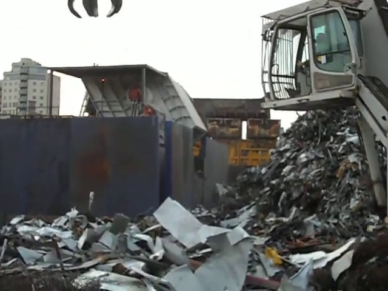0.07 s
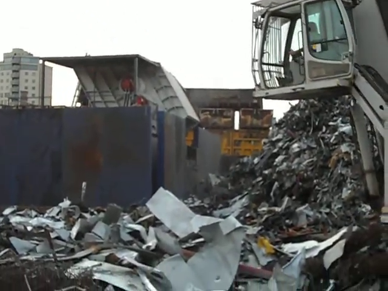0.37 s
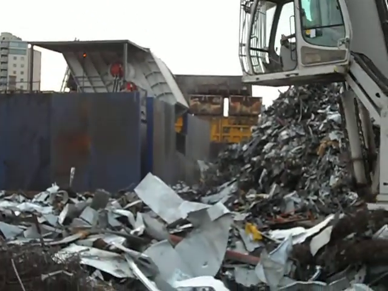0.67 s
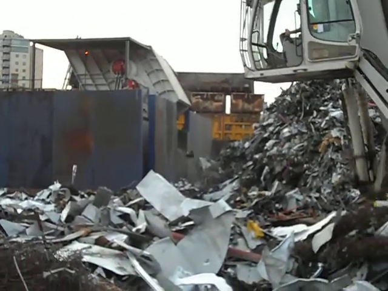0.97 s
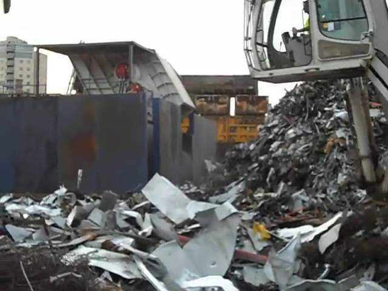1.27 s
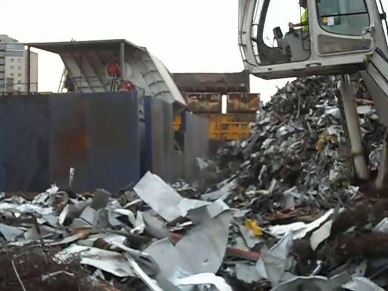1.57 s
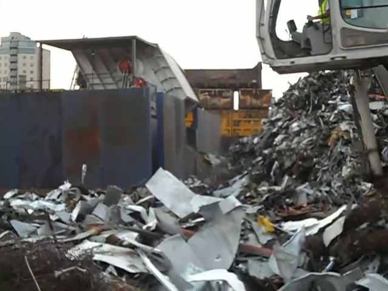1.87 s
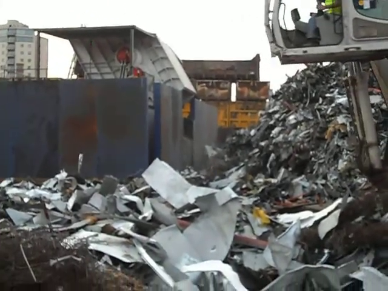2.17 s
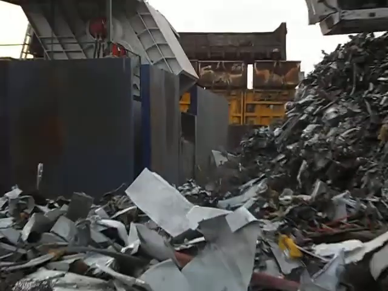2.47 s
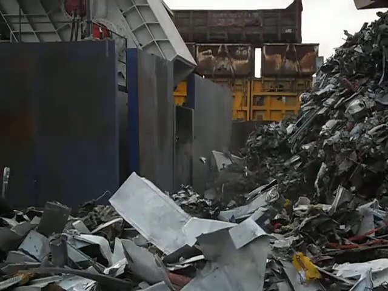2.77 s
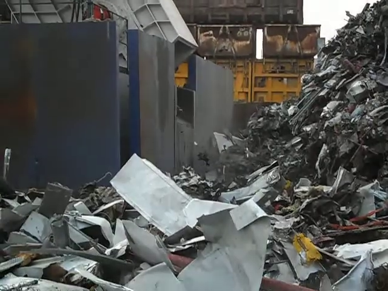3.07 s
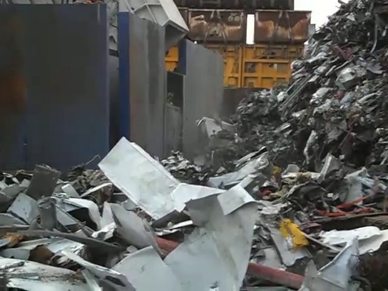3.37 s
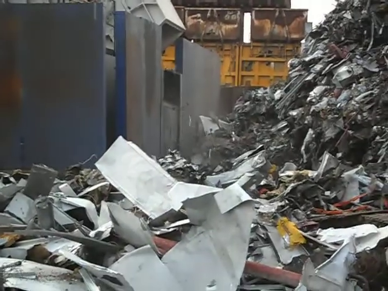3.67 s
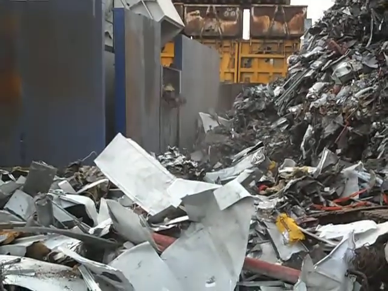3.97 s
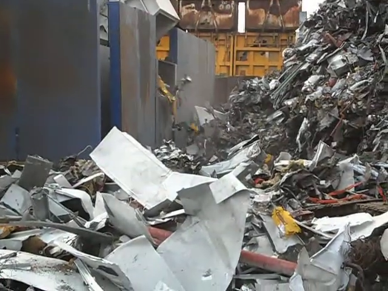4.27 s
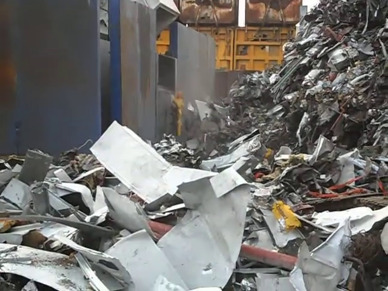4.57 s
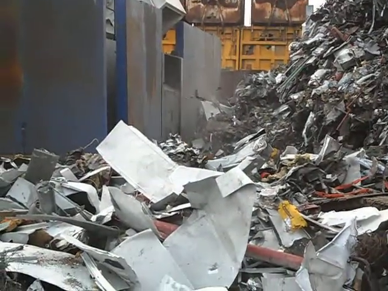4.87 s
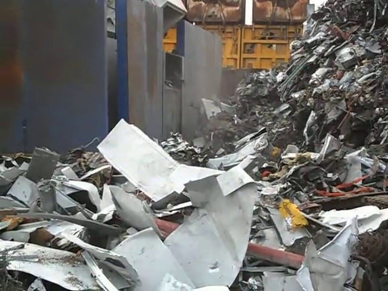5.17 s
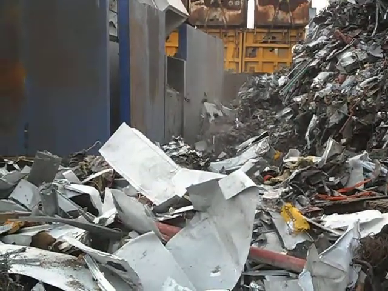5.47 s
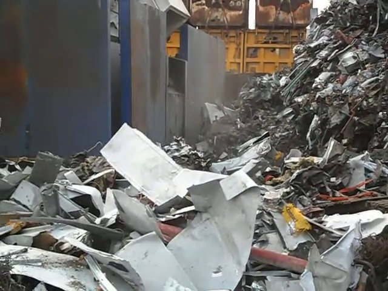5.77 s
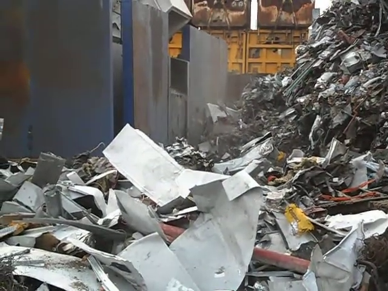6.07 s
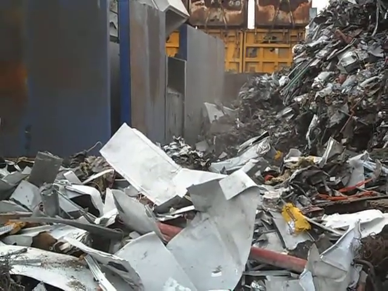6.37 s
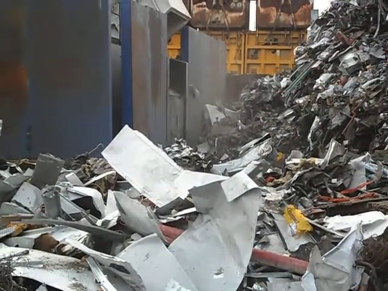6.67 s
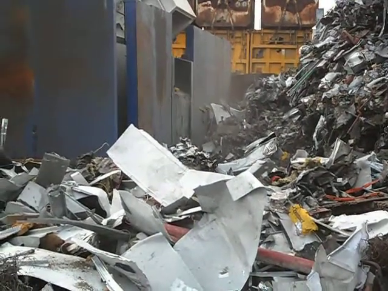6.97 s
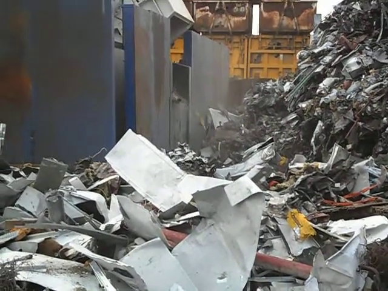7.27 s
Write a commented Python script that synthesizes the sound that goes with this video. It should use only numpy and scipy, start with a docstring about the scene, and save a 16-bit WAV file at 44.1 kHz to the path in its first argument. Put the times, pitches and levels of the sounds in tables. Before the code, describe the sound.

An industrial shredder tears up scrap metal outdoors, heard from a distance with short echoes. A dense, crunching roar of clanks sits over a swelling low hum, with a faint hydraulic hiss early on. Everything drops to silence for half a second, then returns with clusters of hard bangs, a brief high squeal of dragged sheet metal and showers of tinkling fragments.

```python
"""Scrap metal shredder in a yard

Some way off, a rotor hums while hammers batter scrap inside a booming steel housing.
Torn pieces clatter down a chute; big ones bang, ring and scrape.
A crane's hydraulics hiss at first. The sound cuts out for half a second and resumes."""
import sys
import numpy as np
from scipy import signal
from scipy.fft import rfft, irfft, next_fast_len
from scipy.io import wavfile
from scipy.ndimage import uniform_filter1d

SR = 44100
rng = np.random.default_rng(int(sys.argv[2]) if len(sys.argv) > 2 else 0)


def output_pcm(signal):
    """Save a mono or channel-first signal as 16-bit PCM at the path in sys.argv[1].

    Samples are clipped to [-1, 1] before scaling.
    """
    pcm = np.clip(np.atleast_2d(signal).T, -1, 1) * 32767
    wavfile.write(sys.argv[1], SR, np.round(pcm).astype(np.int16))


N = 327222


def amp(db):
    """Turn decibels into a gain to multiply by."""
    return 10 ** (np.asarray(db) / 20)


def unit(x):
    """Scale a signal to an average (RMS) size of 1."""
    return x / np.sqrt(np.mean(x ** 2) + 1e-20)


def level(rows):
    """Join (time_s, level_db) points into a gain for every sample."""
    time_s, level_db = np.transpose(rows)
    return amp(np.interp(np.arange(N) / SR, time_s, level_db))


def add(mix, start_s, sound):
    """Mix a sound in at the given time."""
    part = mix[max(round(start_s * SR), 0):][:len(sound)]
    part += sound[:len(part)]


def colour(x, tone, size=8192):
    """Shape lows and highs with a filter that never sounds early, so hits stay sharp."""
    hz, db = np.transpose(tone)
    f = abs(np.fft.fftfreq(size, 1 / SR))
    log_gain = np.log(amp(np.interp(np.log(f + 1), np.log(hz), db)))
    taps = np.fft.ifft(np.exp(np.conj(signal.hilbert(log_gain)))).real
    return signal.oaconvolve(x, taps[:size // 2])[:len(x)]


def drift(rate_hz, count):
    """A smooth random wobble that changes about rate_hz times a second."""
    size = next_fast_len(count)
    f = np.fft.rfftfreq(size, 1 / SR)
    slow_spectrum = rfft(rng.standard_normal(size)) * np.exp(-(f / rate_hz) ** 2)
    return unit(irfft(slow_spectrum, size))[:count]


def resonance(x, pitch_hz, width_hz):
    """Keep a narrow band of sound around a pitch, which may move."""
    turn = np.exp(2j * np.pi * np.cumsum(pitch_hz * np.ones(len(x))) / SR)
    decay = np.exp(-np.pi * width_hz / SR)
    return unit((turn * signal.lfilter([1], [1, -2 * decay, decay * decay], x / turn)).real)


def burst(t, length_s, rise_s, fall_s):
    """A gain that rises at t = 0, holds, then dies away."""
    return (1 - np.exp(-np.maximum(t, 0) / rise_s)) * np.exp(-np.maximum(t - length_s, 0) / fall_s)


def knocks(per_s, spread_db, count):
    """Random pushes and pulls: many small, a few large."""
    chance, size, side = rng.random((3, count))
    size = np.minimum(-np.log(1 - size), 4)
    return (chance < per_s / SR) * amp(spread_db * size) * np.sign(side - .5)


def piece(spacing_hz, fade_s, size=4096):
    """A crumpled piece rings at random pitches about spacing_hz apart, losing 60 dB in fade_s."""
    chance, phase = rng.random((2, size // 2 + 1))
    tones = (chance < SR / size / spacing_hz) * np.exp(2j * np.pi * phase)
    return unit(irfft(tones) * np.exp(-np.log(1000) * np.arange(size) / SR / fade_s))


def fragments(per_s, spread_db, fade_s, spacing_hz, count=400, size=4096):
    """A stream of pieces: each tumbles by, is knocked a few times and is gone."""
    out = np.zeros(N + size)
    for k in range(count):
        hits = knocks(per_s * N / (count * size), spread_db, size)
        start_s = (k + rng.random()) / count * len(out) / SR
        add(out, start_s, signal.fftconvolve(hits, piece(spacing_hz, fade_s)))
    return unit(out[size:])


def yard(x, echo_db, fade_s):
    """Add scattered echoes from steel walls and scrap heaps."""
    t = np.arange(SR // 2) / SR
    echoes = rng.standard_normal(len(t)) * (rng.random(len(t)) < .1) * (t > .006)
    echoes *= np.exp(-np.log(1000) * t / fade_s)
    return x + amp(echo_db) * signal.oaconvolve(x, echoes / np.linalg.norm(echoes))[:len(x)]


# How hard the shredder works before and after the silence: time_s, relative_load_db
WORK_BEFORE = [(0, -21.5), (0.27, -18.5), (0.52, -21), (0.72, -19), (1.12, -19.5), (1.37, -24.5),
               (1.47, -20.5), (1.66, -20.0), (1.77, -21.5), (1.9, -18.5), (2.17, -20.0)]
WORK_AFTER = [(2.74, -18.5), (2.95, -20.5), (3.06, -23.0), (3.2, -19.5), (3.58, -17.5), (3.679, -23),
              (4.2, -18.0), (4.5, -19.5), (4.76, -18.0), (4.87, -22.5), (5.0, -18.5), (5.33, -18),
              (5.42, -24), (5.7, -23.5), (5.88, -18.5), (6.12, -20), (6.3, -23.0), (6.65, -20),
              (6.92, -18.5), (7.05, -20), (7.4, -19)]

def load_gain(db, follow):
    """Harder work is louder: the gain grows by `follow` dB for each dB of load."""
    return amp(db) * unit(level(np.vstack([WORK_BEFORE, WORK_AFTER]))) ** follow


# Moments when the hum swells: peak_s, level_db
HUM_PEAKS = [(.56, -17.5), (1.0, -25), (1.57, -18.5), (2.87, -32.5), (4.16, -19), (4.38, -20.5),
             (7.19, -18.5)]
# Strength of the frame's deep rumble: time_s, relative_level_db
RUMBLE_LEVELS = [(0, -26), (1.4, -30), (2.2, -26.5), (3.2, -31), (3.45, -26.5), (3.75, -32.5),
                 (4.25, -24.5), (4.85, -29), (5.45, -34.5), (5.85, -28.5), (7.4, -27.5)]
# Tone of that rumble: pitch_hz, relative_level_db
RUMBLE_TONE = [(15, -20.5), (26, -4.5), (33, 2), (47, -5), (62, -1.5), (100, -5), (140, -3.5), (260, -55)]

def rotor(turn_hz=20.5, throb_db=-32, hum_hz=150.9, wander=.01, swell_s=0.11):
    """The rotor throbs once a turn and hums, louder under load; the frame shakes with it."""
    t = np.arange(N) / SR
    clock = np.cumsum(1 + wander * drift(8.6, N)) / SR  # the speed is slightly uneven
    throb = amp(throb_db) * np.sin(2 * np.pi * turn_hz * clock)
    swells = sum(amp(db) * np.exp(-((t - peak_s) / swell_s) ** 2) for peak_s, db in HUM_PEAKS)
    hum = np.hypot(load_gain(db=-29, follow=0.67), swells) * np.sin(2 * np.pi * hum_hz * clock)
    rumble = amp(2) * level(RUMBLE_LEVELS) * unit(colour(rng.standard_normal(N), RUMBLE_TONE))
    return throb + hum + rumble


# Low notes of the steel housing: pitch_hz, width_hz, relative_level_db
HOUSING_NOTES = [(155, 19, -5), (178.4, 17.5, -2.5), (209.8, 27, -4.5)]
# Heavy lumps thumping round inside: start_s, length_s, relative_level_db
LUMPS = [(.06, 0.26, -21), (0.877, .11, -17.5), (1.631, 0.069, -15.5), (2.057, 0.057, -15.5),
         (2.16, 0.046, -15), (2.7, .05, -18.5), (4.25, 0.13, -18), (6.65, 0.046, -18.5),
         (6.89, .045, -15.5)]
# Tone of the hammer blows: pitch_hz, relative_level_db
BLOW_TONE = [(70, -34), (125, -11.5), (160, -5), (180, 1), (215, -2.5), (255, -7.5), (330, -10),
             (480, -20.5), (1000, -53.5)]

def housing():
    """Hammer blows make the heavy steel box boom, most of all when a lump goes round."""
    t = np.arange(N) / SR
    blows = unit(knocks(per_s=420, spread_db=3, count=N)) + amp(-1.5) * rng.standard_normal(N)
    boom = unit(sum(amp(db) * resonance(rng.standard_normal(N), pitch_hz, width_hz)
                    for pitch_hz, width_hz, db in HOUSING_NOTES))
    thumps = sum(amp(db) * burst(t - start_s, length_s, rise_s=.008, fall_s=0.014)
                 for start_s, length_s, db in LUMPS)
    force = np.hypot(load_gain(db=-23, follow=0.62), thumps)  # hypot adds their powers
    return force * (amp(-2) * unit(colour(blows, BLOW_TONE)) + amp(-4.5) * boom)


# Tone of scrap being torn: pitch_hz, relative_level_db
CRUNCH_TONE = [(120, -18.5), (260, -4), (350, -3), (450, 0.5), (600, -2.5), (800, -3), (1020, -4),
               (1350, -9.5), (1700, -11), (2100, -19), (3000, -27.5), (6000, -53.5)]

def crunch():
    """Scrap is torn and tumbled inside: a crowd of short clanks over a roar."""
    clanks = fragments(per_s=750, spread_db=3, fade_s=0.034, spacing_hz=50.24)
    roar = amp(0.5) * rng.standard_normal(N)
    echoing = yard(clanks + roar, echo_db=-15.5, fade_s=0.29)
    return load_gain(db=-19.5, follow=1) * unit(colour(echoing, CRUNCH_TONE))


# Sudden showers from the chute: start_s, length_s, shreds_db, chips_db
CHUTE_SHOWERS = [(0, 0.36, -33, -45.5), (0.65, .04, -34, -44), (1.48, 0.12, -37.5, -45),
                 (1.81, 0.078, -36, -46), (3.29, .22, -29.5, -38), (4.047, 0.16, -38, -44),
                 (4.45, 0.19, -38, -45.5), (4.85, 0.33, -39, -45), (5.468, 0.47, -38.5, -49),
                 (6.554, 0.034, -30.5, -41), (6.8, 0.52, -39, -53)]
# Tones of the shreds and of the finer chips: pitch_hz, relative_level_db
SHRED_TONE = [(900, -6), (1900, -5), (2500, -0.5), (3200, -3), (3700, -4), (4600, -2.5), (5400, -7),
              (6200, -15), (8000, -26.5), (11000, -53.5)]
CHIP_TONE = [(3500, -21.5), (5500, 0.5), (6700, -0.5), (8000, -2), (9700, -6), (11000, -7.5)]

def shreds():
    """Shreds and fine chips clatter down the chute, in showers and in a stream that follows the load."""
    t = np.arange(N) / SR
    tinkle = fragments(per_s=760, spread_db=6, fade_s=0.04, spacing_hz=305)
    tinkle += amp(5.5) * rng.standard_normal(N)
    chips = fragments(per_s=560, spread_db=4, fade_s=0.047, spacing_hz=406)
    chips += amp(0.5) * rng.standard_normal(N)
    shred_flow = load_gain(db=-33.5, follow=0.84)
    chip_flow = load_gain(db=-45.5, follow=0.84)
    for start_s, length_s, shreds_db, chips_db in CHUTE_SHOWERS:
        shower = burst(t - start_s, length_s, rise_s=0.0059, fall_s=.035)
        shred_flow = np.hypot(shred_flow, amp(shreds_db) * shower)
        chip_flow = np.hypot(chip_flow, amp(chips_db) * shower)
    clatter = unit(colour(yard(tinkle, echo_db=-23, fade_s=.12), SHRED_TONE))
    return shred_flow * clatter + chip_flow * unit(colour(chips, CHIP_TONE))


# Hiss of the crane's hydraulics: time_s, level_db
HISS_LEVELS = [(0, -35), (.4, -37.5), (1.1, -39.5), (1.5, -37), (1.9, -35.5), (2.2, -37), (2.7, -63)]

def hydraulics(centre_hz=2950, split=0.071, waver=0.032, width_hz=260):
    """Oil sings through the crane's valves in two thin, wavering bands of hiss."""
    hiss = np.zeros(N)
    for side in (-1, 1):
        flow = rng.standard_normal(N)
        pitch_hz = centre_hz * (1 + side * split + waver * drift(12, N))
        hiss += resonance(flow, pitch_hz, width_hz)
    return level(HISS_LEVELS) * unit(hiss)


# Big pieces hit by the hammers: start_s, relative_level_db, extra_treble_db, cutoff_hz
BIG_HITS = [(0.213, -19, -9, 2000), (0.757, -14.5, 3.5, 4600), (.885, -22.5, 12, 3440),
            (1.113, -13.5, -5, 1510), (1.412, -20, -2, 3610), (2.712, -19, -2, 2500),
            (2.734, -15.5, -1, 5000), (2.833, -19.5, 2, 5000), (2.923, -13, -3, 5540),
            (3.362, -19.5, 7, 6000), (3.477, -18, 0.5, 5330), (3.526, -15, 1, 5060), (3.586, -15, -4, 5350),
            (4.161, -19.5, 8, 1490), (4.609, -14.5, -4, 5000), (4.717, -13, -1, 5300),
            (4.988, -13, -2.5, 5700), (5.125, -18, 8.5, 5300), (5.178, -17.5, 9.5, 5440),
            (5.309, -10, -2, 2450), (5.884, -18.5, 1, 2840), (6.118, -9.5, -16, 2400),
            (6.636, -22, 0, 2000), (6.869, -13.5, -19, 2520), (7.335, -15, -5, 1400)]
# Tone of a struck steel plate: pitch_hz, relative_level_db
PLATE_TONE = [(60, -33), (170, -5), (450, 1), (1000, 2), (1400, -2), (1800, -2), (2300, -8), (3200, -8.5),
              (4700, -14), (6200, -14), (10000, -15.5)]

def bangs(thud_s=0.16, crack_s=.04, rise_s=0.0019, treble_life=0.44, split_hz=1500):
    """A big piece cracks, rings and rattles against the walls; its treble dies first."""
    t, out = np.arange(SR // 3) / SR, np.zeros(N)
    fade = -np.log(1000) * t
    attack = 1 - np.exp(-t / rise_s)
    for start_s, db, treble_db, cutoff_hz in BIG_HITS:
        rattle = unit(knocks(per_s=810, spread_db=0.5, count=len(t))) + rng.standard_normal(len(t))
        clank = piece(spacing_hz=134.6, fade_s=1, size=len(t))
        struck = colour(amp(-3) * rattle + amp(-1) * clank, PLATE_TONE)
        body = unit(signal.sosfilt(signal.butter(7, cutoff_hz, fs=SR, output="sos"), struck))
        lows = signal.lfilter(*signal.butter(2, split_hz, fs=SR), body)
        highs = signal.lfilter(*signal.butter(2, split_hz, "high", fs=SR), body)
        thud = lows * np.exp(fade / thud_s)
        clash = amp(treble_db) * highs * np.exp(fade / (thud_s * treble_life))
        crack = amp(-20) * unit(struck) * np.exp(fade / crack_s)
        add(out, start_s, amp(db) * attack * (crack + thud - clash))
    return amp(-3.5) * yard(out, echo_db=-4, fade_s=0.17)


# Sheets that ring or squeal as they are dragged through: start_s, length_s, pitch_hz, wobble_hz, level_db
DRAGGED_SHEETS = [(0.218, 0.055, 431, 18, -18), (.758, 0.043, 1600, 220, -22), (1.11, 0.23, 461, 10.2, -21),
                  (2.92, 0.026, 990, 98, -17.5), (3.146, 0.15, 3960, 130, -38.5),
                  (3.18, 0.18, 3730, 110, -35), (3.239, 0.18, 3610, 130, -33),
                  (5.169, 0.019, 4500, 130, -29.5), (5.31, 0.052, 1830, 115, -25.5),
                  (6.113, 0.055, 1735, 74, -24), (6.631, 0.034, 1725, 120, -28),
                  (6.867, 0.089, 260, 10, -28)]

def ringing_sheets(rise_s=.003, fall_s=0.015, sag_db_per_s=29):
    """Rubbing keeps a bending sheet ringing on one shaky, weakening note until it slips free."""
    t, out = np.arange(SR // 2) / SR, np.zeros(N)
    for start_s, length_s, pitch_hz, wobble_hz, db in DRAGGED_SHEETS:
        shaky_hz = pitch_hz + wobble_hz * drift(wobble_hz, len(t))
        grip = 1 + .35 * drift(2 * wobble_hz, len(t))
        note = unit(grip * np.sin(2 * np.pi * np.cumsum(shaky_hz) / SR))
        held = amp(db - sag_db_per_s * t) * burst(t, length_s, rise_s, fall_s)
        add(out, start_s, held * note)
    return out


def scene():
    """The shredder, its scrap and the crane, on one channel."""
    return (rotor() + housing() + crunch() + shreds() + hydraulics() + bangs() + ringing_sheets())[None]


# The highest sounds fall away above 10 kHz: pitch_hz, gain_db
TREBLE_ROLLOFF = [(9800, -0.5), (10400, -5.5), (11000, -18.5), (12000, -21)]
SILENCE_START_S, SILENCE_END_S = 2.1965, 2.7073
PEAK_LIMIT, TOP_HZ = .62, 12150

def record(dry):
    """Peaks are rounded off, the top treble is dulled, and the sound cuts out once."""
    t = np.arange(N) / SR
    rounded = dry / (1 + (dry / PEAK_LIMIT) ** 6) ** (1 / 6)
    sound_on = (t < SILENCE_START_S) | (t > SILENCE_END_S)
    cut = colour(rounded[0], TREBLE_ROLLOFF) * uniform_filter1d(1. * sound_on, size=8)
    low_pass = signal.firwin(301, TOP_HZ, window=("kaiser", 8), fs=SR)
    return signal.oaconvolve(cut, low_pass, "same")[None]


dry = scene()
out = record(dry)
output_pcm(out)
```